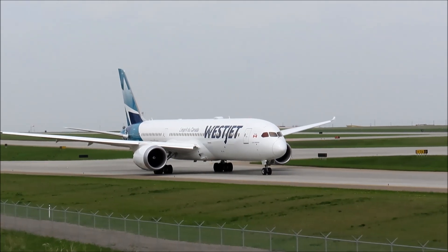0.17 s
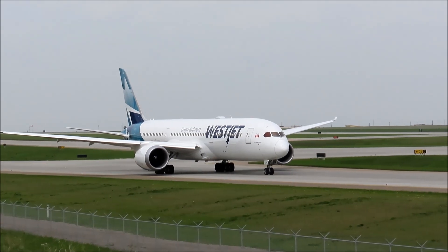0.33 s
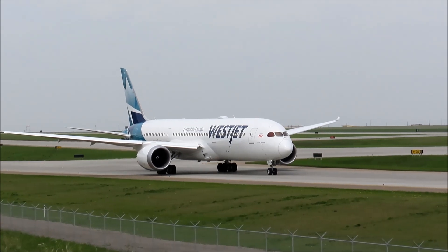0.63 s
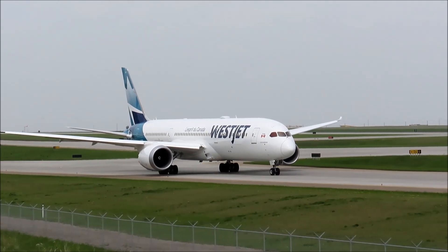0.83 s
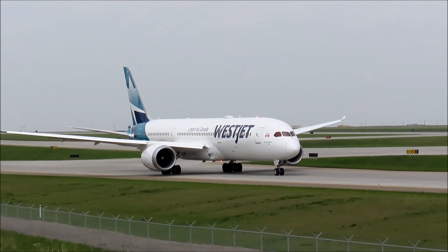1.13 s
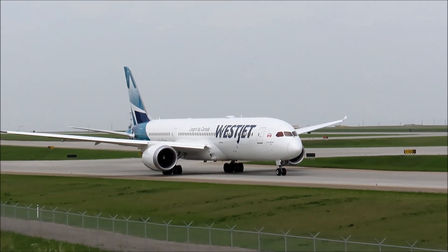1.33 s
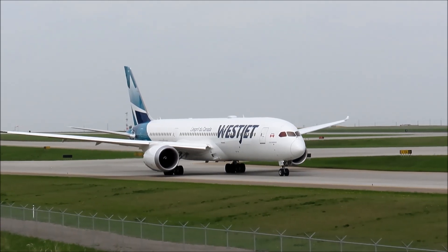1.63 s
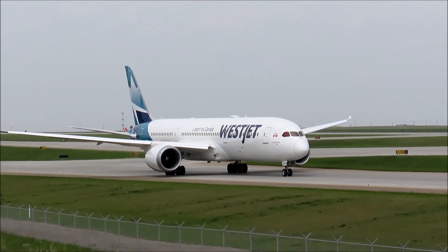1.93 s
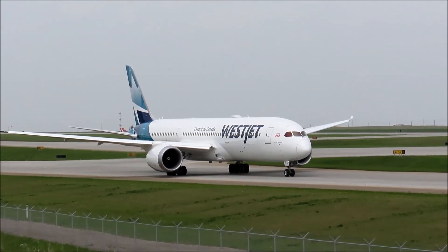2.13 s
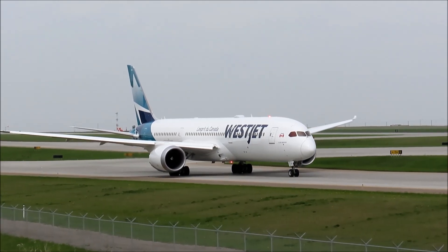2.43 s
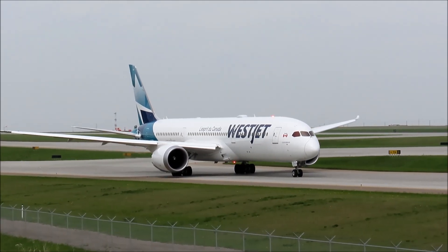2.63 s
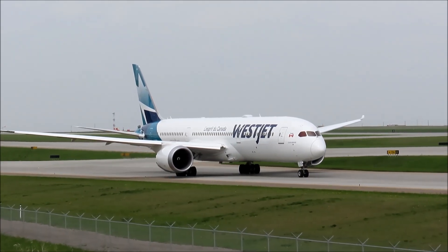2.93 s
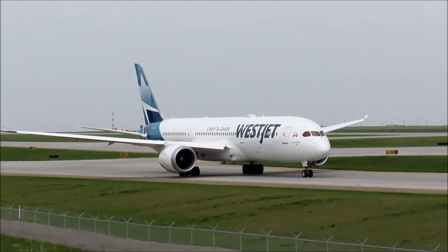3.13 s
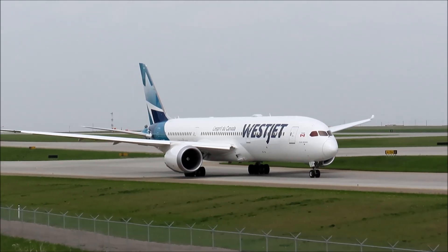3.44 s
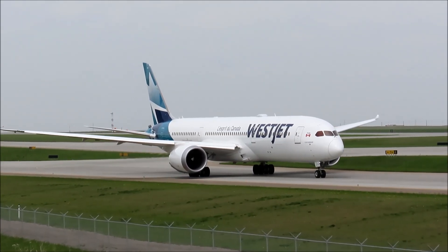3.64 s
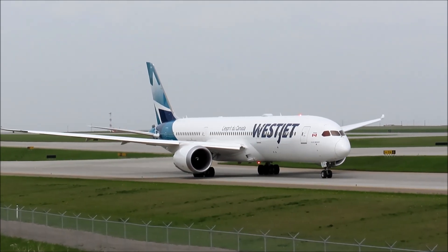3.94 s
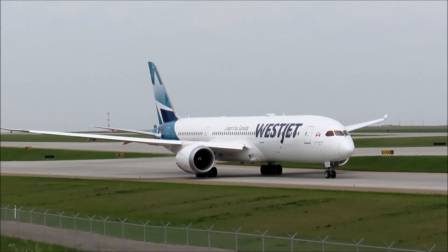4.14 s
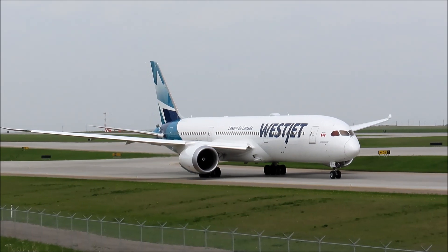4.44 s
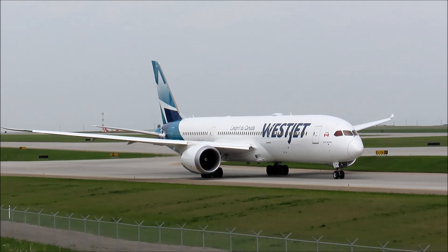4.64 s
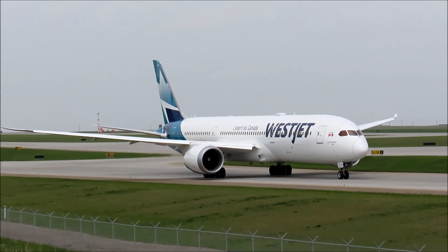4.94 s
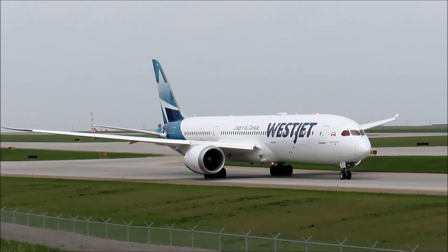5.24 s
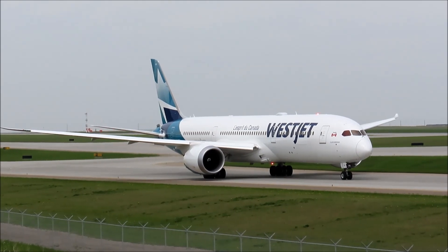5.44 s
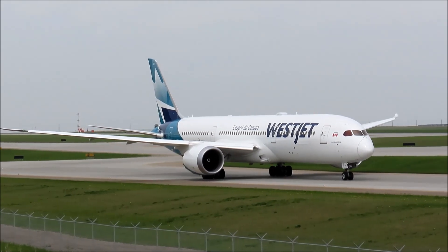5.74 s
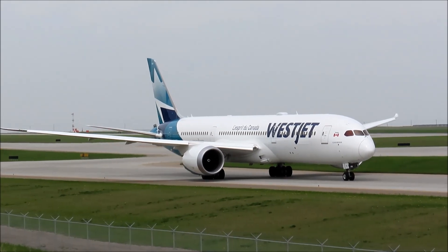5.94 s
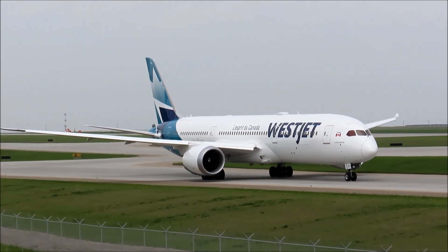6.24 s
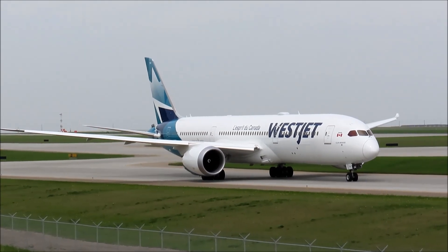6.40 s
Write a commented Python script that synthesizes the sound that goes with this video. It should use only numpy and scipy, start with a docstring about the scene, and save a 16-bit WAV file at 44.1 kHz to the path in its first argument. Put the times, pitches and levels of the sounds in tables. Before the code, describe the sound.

A large jet taxis with a wavering roar and thin high whine, then a propeller plane's low drone swells past amid soft wind thumps.

```python
"""At a grass field, two large jet engines idle some way off: a broad roar with thin compressor whines.
The roar swells in bands as the air between bends the sound. A propeller aircraft passes on a straight line,
its four blade tones sinking in pitch. Gusts thump as low noise on a small two-capsule microphone, whose
capsules hear most of the jet sound out of step. A faint hiss flickers above."""
import sys
import numpy as np
from scipy import signal
from scipy.fft import rfft, irfft, next_fast_len
from scipy.io import wavfile
from scipy.ndimage import uniform_filter1d

SR = 44100
rng = np.random.default_rng(int(sys.argv[2]) if len(sys.argv) > 2 else 0)


def persist_wave(psi):
    """Save psi, clipped to +-1, as 16-bit WAV."""
    counts = np.round(np.clip(psi, -1, 1) * 32767).astype(np.int16)
    wavfile.write(sys.argv[1], SR, np.atleast_2d(counts).T)


N = 289737
FFT_SIZE = next_fast_len(N)
HZ = np.maximum(np.fft.rfftfreq(FFT_SIZE, 1 / SR), 1)
T = np.arange(N) / SR   # seconds

# swell of the jet sound through the air: time_s, treble_swing_db, middle_swing_db
AIR_SWELL = [(0, -2.5, -0.5), (.14, 2.5, 1), (.3, 3, -3), (.55, 3.5, -0.5), (.75, 3.5, 1), (.9, 1, -1.5),
             (1.08, -1, 0), (1.37, 3.5, -0.5), (1.5, -0.5, 1.5), (1.64, 5, 1), (1.75, 6, 1), (1.84, 5, 0),
             (1.95, -.5, 3), (2.15, -2, 4), (2.6, 0.5, 0), (3, -0.5, -0.5), (3.3, -3, -4),
             (3.65, -1.5, -6.5), (4.15, -8, -6.5), (4.42, -8.5, -7.5), (4.6, -7.5, -3.5), (4.9, -6, -6),
             (5.15, -5.5, -4), (5.4, -5, -7.5), (5.65, -8.5, -9), (6, -7, -8.5), (6.37, -5, -6.5),
             (6.57, -4.5, -4)]


def roar(flicker_db, low_hz):
    """Broad jet noise, one part shared by both capsules and one scattered for each; its bands swell apart."""
    # usual roar before the bands move: frequency_hz, density_db (per Hz)
    roar_colour = [(40, -82), (70, -64), (140, -62), (170, -66.5), (220, -68), (350, -59.5), (480, -55),
                   (680, -54.5), (800, -56.5), (960, -57), (1150, -57), (1400, -62.5), (1750, -61),
                   (2050, -60.5), (2300, -59.5), (2850, -60.5), (3200, -62), (3500, -64), (3900, -65.5),
                   (4200, -67), (4500, -66), (5100, -68), (6000, -74), (7300, -84), (8200, -94),
                   (9200, -118), (10500, -150)]
    # intake resonance added to that colour: centre_hz, width_hz, height_db
    intake_hump = (2410, 515, 4.97)
    # overlapping bands: centre_hz, offset_db, treble_swing_share, middle_swing_share, rise_db_per_s
    bands = [(259, -3.5, 0.088, 0.043, 1.26), (434, -3, 0.14, .05, 0.14), (734, 0.5, 0.092, 0.43, -0.31),
             (1060, 1.37, 0.046, .95, 0), (1600, 1.04, 0.53, 0.32, 0.14), (2390, -2.5, 0.86, 0.16, -0.05),
             (2960, -1, 1.03, 0.12, 0.01), (3550, 0.5, 1.24, 0.081, 0.6), (4430, 0, 0.98, .05, 0.36),
             (5530, 0, 0.89, .05, 0.22), (7500, 0, 0.94, .05, 0.8)]
    # brief swells and sinks of the nearest band: peak_s, frequency_hz, change_db, length_s
    band_patches = [(0.16, 720, 3.5, 0.25), (2.2, 4300, -3, .4), (5.8, 4300, -3, .5),
                    (1.2, 4300, -0.5, 0.22), (2.4, 259, -5, 0.69), (2.4, 1600, 2, 0.28),
                    (0.23, 1600, 5.5, 0.18), (.85, 1600, 1.5, .4), (5.8, 1600, 1.5, .6),
                    (5.7, 720, -0.5, .6), (6.1, 259, 1.5, .6), (2.12, 1070, 1.5, .25),
                    (2.4, 1070, 2.5, 0.2), (2.4, 720, -0.5, .4), (3.5, 1070, 2.5, .4), (3.2, 720, 2, .6),
                    (3.1, 259, 1.5, .6), (0.83, 5500, -6.5, .2), (1.15, 2400, -2, 0.42),
                    (1.44, 2400, 5, 0.19), (2.03, 450, -3, 0.57), (2.128, 2400, -6, 0.091),
                    (2.27, 2400, 4, .3), (2.57, 2400, -4.5, 0.18), (4.89, 3500, 3.5, 0.31),
                    (4.4, 450, -3.5, 0.93), (5.42, 3500, 5.5, 0.24), (1.75, 5500, 0.5, .25),
                    (1.37, 2400, -3, .15), (3.5, 2950, 0.5, .3), (7, 450, 8, 0.25), (6.1, 5500, -2.5, 0.28),
                    (6.3, 450, 5, .5)]
    # extra scattered roar in the low bands: time_s, boost_db
    low_scatter = [(0, 11), (.8, 8.5), (2, 5.5), (3.6, 4.5), (5.1, 2), (5.7, 4.5), (6.57, 5.5)]
    lean_start_db, lean_end_s = 4, 0.81   # the low bands lean left at first, then settle

    treble_db, middle_db = in_time(AIR_SWELL)
    scatter_db = in_time(low_scatter)[0]
    lean_db = lean_start_db * np.maximum(1 - T / lean_end_s, 0)

    hump_hz, width_hz, hump_db = intake_hump
    hump = hump_db * np.exp(-(2 * (HZ - hump_hz) / width_hz) ** 2)
    colour_db = in_hz(roar_colour)[0] + hump
    # the root turns density per Hz into gain for white noise
    white = rfft(rng.standard_normal((3, N)), FFT_SIZE)
    noise = white * amp(colour_db) * np.sqrt(SR / 2)

    centres = np.array(bands)[:, 0]
    shared, scattered = 0, 0
    for k, (hz, offset_db, treble_share, middle_share, rise) in enumerate(bands):
        level_db = offset_db + treble_share * treble_db + middle_share * middle_db + rise * T
        for peak_s, patch_hz, change_db, length_s in band_patches:
            nearest_band = np.abs(np.log(centres / patch_hz)).argmin()
            if nearest_band == k:
                level_db = level_db + change_db * bump(peak_s, length_s)
        # full at its own centre, fading to nothing at the neighbouring centres
        band_gain = np.interp(np.log(HZ), np.log(centres), np.arange(len(centres)) == k)
        low = hz < low_hz
        gain = amp(level_db + flicker_db * drift(5.7)) * panned(lean_db * low)
        parts = irfft(noise * band_gain, FFT_SIZE)[:, :N]
        shared = shared + gain * parts[0]
        scattered = scattered + gain * amp(scatter_db * low) * parts[1:]
    return shared, scattered


def whines(waver_hz, flutter_db, fades_per_s):
    """Sines of the compressor blades and a shaft hum that waver and flutter on their way through moving air."""
    # tone levels before the flutter: time_s, blade_tone_db, upper_neighbour_db, lower_neighbour_db (rms)
    whine_swells = [(0.0, -49.5, -60.0, -58.0), (0.06, -33.5, -47.0, -49.0), (0.1, -30.5, -46.5, -51.5),
                    (0.2, -34.0, -38.0, -52.5), (0.27, -33.0, -39.5, -55.0), (0.32, -50.0, -40.0, -50.0),
                    (0.4, -52.0, -40.5, -45.5), (0.44, -31.5, -40.0, -41.5), (0.48, -28.5, -39.5, -38.5),
                    (0.51, -29.0, -41.5, -39.5), (0.58, -34.0, -52.5, -53.0), (0.73, -30.0, -55.0, -54.0),
                    (0.77, -30.0, -43.5, -45.0), (0.84, -30.0, -43.0, -44.5), (0.89, -42.0, -45.5, -56.5),
                    (0.98, -43.0, -58.5, -56.5), (1.1, -42.0, -48.5, -45.5), (1.2, -42.0, -56.5, -55.5),
                    (1.27, -43.0, -46.5, -44.0), (1.34, -38.0, -55.5, -48.5), (1.41, -37.5, -48.5, -44.0),
                    (1.51, -36.5, -55.0, -48.0), (1.63, -32.5, -36.5, -50.0), (1.72, -31.0, -35.0, -48.5),
                    (1.82, -32.0, -45.5, -43.0), (1.87, -35.0, -52.0, -49.0), (1.97, -50.5, -46.0, -52.5),
                    (2.07, -58.0, -60.5, -56.0), (2.18, -42.0, -54.0, -54.5), (2.28, -48.5, -59.5, -54.0),
                    (2.34, -40.0, -52.0, -54.0), (2.42, -39.5, -47.5, -47.0), (2.48, -36.5, -45.5, -55.5),
                    (2.85, -38.0, -49.0, -43.0), (2.91, -35.5, -44.0, -42.0), (2.99, -35.5, -47.0, -56.0),
                    (3.11, -37.0, -43.0, -52.5), (3.18, -47.0, -42.0, -55.0), (3.3, -46.0, -51.5, -57.0),
                    (3.4, -37.5, -46.0, -54.5), (3.49, -37.5, -50.0, -45.5), (3.6, -41, -60.5, -57.0),
                    (3.65, -46.0, -51.5, -57.0), (3.75, -37.0, -58.5, -55.0), (3.84, -46.0, -55.0, -57.0),
                    (3.95, -50.0, -44.5, -59.5), (4.08, -44.0, -52.0, -45.0), (4.33, -53.5, -51.0, -65.0),
                    (4.54, -53.0, -50.0, -51.0), (4.62, -63.0, -63.0, -56.5), (4.81, -43.0, -43.0, -49.0),
                    (5.1, -44.5, -62.0, -62.0), (5.29, -44.5, -61.0, -53.5), (5.35, -49.0, -46.5, -48.5),
                    (5.41, -57.0, -41.5, -58.0), (5.53, -51.0, -40.0, -58.5), (5.69, -53.5, -47.0, -63.5),
                    (5.74, -55.0, -60.0, -49.0), (5.82, -46.0, -62.0, -55.0), (5.91, -46.5, -47.0, -55.0),
                    (6.0, -47.0, -60.0, -57.0), (6.09, -52.0, -50.0, -52.0), (6.16, -43.0, -48.0, -55.0),
                    (6.24, -43.0, -48.0, -50.0), (6.29, -55.0, -56.0, -48.0), (6.38, -42.5, -44.0, -43.5),
                    (6.49, -41.5, -43.5, -49.0), (6.56, -53.5, -45.5, -56.5)]
    # blade tone and its shaft-rate neighbours, in the same order: pitch_hz
    whine_pitches = [3791.2, 3959.6, 3621.6]
    # shaft hum: pitch_hz, level_db (rms before swings), treble_swing_share, middle_swing_share, fading_db
    shaft_hum = (863.5, -37.5, 0.6, 1.2, 1.5)

    treble_db, middle_db = in_time(AIR_SWELL)
    hum_hz, hum_db, treble_share, middle_share, fading_db = shaft_hum
    hum_db = hum_db + treble_share * treble_db + middle_share * middle_db
    hum_gain = amp(hum_db + fading_db * drift(fades_per_s))
    # these levels glide in gain rather than in decibels
    whine_gains = in_time([(s, *amp(levels_db)) for s, *levels_db in whine_swells])

    tones = 0
    for hz, gain in zip([hum_hz, *whine_pitches], [hum_gain, *whine_gains]):
        phase = 2 * np.pi * np.cumsum(hz + waver_hz * drift(5.6)) / SR
        flutter = amp(flutter_db * drift(8.6))
        tones = tones + np.sqrt(2) * gain * flutter * np.sin(phase)
    return tones


def capsules(shared, scattered, tones):
    """Shared sound reaches each capsule at its own level and phase; the scattered part is unrelated."""
    # capsule pair towards the jets: frequency_hz, left_over_right_db, left_lead_rad, likeness (0 to 1)
    capsule_pair = [(170.0, 4.2, -2.3, 0.95), (260.0, 3.6, -2.57, 0.9), (400.0, 2.8, -3.02, 0.95),
                    (560.0, -1.2, -2.83, 0.97), (750.0, -1.7, -3.18, 0.98), (900.0, -5.2, -3.43, 0.955),
                    (1150.0, -4.8, -3.05, 0.94), (1300.0, -3.2, -3.15, 0.96), (1450.0, -2.6, -3.22, 0.93),
                    (1900.0, -5.2, -3.42, 0.95), (2350.0, -2.6, -3.75, 0.97), (2700.0, -4.8, -4.09, 0.86),
                    (3300.0, -1.0, -4.59, 0.93), (3500.0, -4.1, -4.94, 0.89), (3620.0, -5.2, -4.86, 0.89),
                    (3800.0, -4.8, -4.75, 0.9), (3900.0, -3.4, -4.9, 0.9), (4050.0, -6.3, -5.41, 0.74),
                    (4150.0, -9.2, -4.08, 0.43), (4350.0, -1.3, -4.07, 0.94), (4700.0, -0.1, -4.75, 0.92),
                    (5100.0, 4.7, -5.05, 0.92), (6000.0, 6.2, -6.15, 0.87), (6800.0, 3.0, -6.72, 0.85),
                    (7300.0, 6.0, -6.57, 0.73), (8000.0, 7.8, -7.79, 0.35), (8500.0, 5.0, -8.34, 0.34)]
    pan_db, lead, likeness = in_hz(capsule_pair)
    likeness = np.clip(likeness, 0, 1)
    turn = np.exp(.5j * np.outer([1, -1], lead))   # half the lead on each side
    gains = panned(pan_db)
    together = shape(shared, gains * turn * np.sqrt(likeness))
    apart = shape(scattered, gains * np.sqrt(1 - likeness))
    return together + apart + shape(tones, gains * turn)


def propeller(flutter_db):
    """Four sine partials of the blade rate, Doppler-shifted by the speed of approach on a straight pass."""
    # partial levels before flutter and panning: time_s, first_db, second_db, third_db (rms)
    partial_levels = [(0.0, -36, -36.5, -35), (0.08, -34, -33.5, -33), (0.13, -30.5, -38, -42),
                      (0.19, -33.5, -45.5, -39), (0.39, -38.5, -46, -36.5), (0.49, -37.5, -49, -27),
                      (0.57, -42.5, -43.5, -32.5), (0.61, -46, -41, -36), (0.66, -39, -47, -56),
                      (0.71, -43, -58, -43), (0.75, -44, -61, -33.5), (0.9, -46, -57, -50),
                      (1.05, -51, -53, -45), (1.4, -46, -54, -39), (1.66, -41.0, -51, -36.5),
                      (1.71, -43, -54, -36), (1.76, -46, -55, -55), (1.92, -41, -60, -59),
                      (2.21, -41.5, -45.5, -40), (2.45, -35, -41, -48), (2.65, -36.5, -40, -54),
                      (2.76, -35, -50, -41), (2.84, -35, -51, -50), (3.05, -30.5, -41.5, -32.5),
                      (3.16, -30, -40, -34), (3.24, -26, -42, -45), (3.65, -18.5, -37, -38.5),
                      (3.85, -16.5, -38.5, -36.5), (3.94, -18, -36.5, -34), (4.11, -16, -33.5, -35.5),
                      (4.38, -17.5, -34.5, -46.0), (4.46, -19.5, -40, -41.5), (4.61, -15, -37.5, -56),
                      (4.69, -16.5, -36, -42), (4.86, -19, -50, -55), (4.94, -17, -50, -40.5),
                      (5.12, -20, -50.0, -55.5), (5.18, -21, -49.0, -39), (5.25, -20, -48.0, -47),
                      (5.32, -20.0, -50, -35.5), (5.36, -19.5, -48.0, -39), (5.41, -20, -50, -56),
                      (5.56, -23.5, -52, -49), (5.61, -22.5, -57, -59), (5.87, -21, -46, -42),
                      (5.96, -24.0, -49, -49), (6.31, -23, -44, -54), (6.41, -24.5, -40.5, -34.5),
                      (6.56, -24, -51, -38)]
    # short swells of partial 4, likewise: peak_s, level_db (rms), length_s
    fourth_swells = [(.57, -37, .35), (1.07, -42, .15), (1.47, -43, .15), (2.35, -41, .35), (3.27, -42, .2),
                     (5.22, -40.5, .3), (6.45, -43, .2)]
    # sides of each partial: left_over_right_before_db, left_over_right_after_db,
    # left_lead_before_rad, left_lead_after_rad
    partial_sides = [(8.5, 6, .45, -.48), (7.5, 7, -4.1, -2.35), (7.5, 3.5, -3.8, -2.6), (1, 2, -3.3, -2.8)]
    blade_rate_hz, speed_m_s, sound_m_s = 105.2, 74.4, 343
    nearest_m, nearest_s = 285, 4.463
    # partial 1 swings left, peaking at 3.0 s when the partials change side, then settles
    swing_peak_db, side_change_s, side_change_width_s, settle_s = 13, 3.0, .2, 0.7

    ahead_m = speed_m_s * (nearest_s - T)
    approach = ahead_m / np.hypot(ahead_m, nearest_m)   # share of the speed towards the microphone
    hz = blade_rate_hz / (1 - speed_m_s / sound_m_s * approach)
    phase = 2 * np.pi * np.cumsum(hz) / SR

    late = T - side_change_s
    swing_db = swing_peak_db * np.exp(np.where(late < 0, late / side_change_width_s, -late / settle_s))
    changed = 1 / (1 + np.exp(-late / side_change_width_s))
    turned = np.clip(T / (side_change_s + settle_s), 0, 1)   # slower turn for the upper partials

    fourth_gain = sum(amp(db) * bump(s, length_s) for s, db, length_s in fourth_swells)
    fourth_db = 20 * np.log10(fourth_gain + 1e-9)
    levels_db = [*in_time(partial_levels), fourth_db]

    drone = 0
    for k, (level_db, sides) in enumerate(zip(levels_db, partial_sides)):
        pan_before, pan_after, lead_before, lead_after = sides
        pan_db = pan_before + (pan_after - pan_before) * changed + swing_db * (k == 0)
        lead = lead_before + (lead_after - lead_before) * (turned if k else changed)
        wave = np.sin((k + 1) * phase + np.array([lead / 2, -lead / 2]))
        gain = amp(level_db + flutter_db * drift(7.2))
        drone = drone + np.sqrt(2) * gain * panned(pan_db) * wave
    return drone


def wind(evened, over_s):
    """Low rumble, alike on both capsules, its loudness partly evened out; strong gusts thump over steadier wind."""
    # colour of the rumble before it is set to level: frequency_hz, density_db (per Hz)
    wind_colour = [(8, -8), (22, 2.5), (32, 2.5), (45, -2), (65, -6), (90, -11), (130, -16), (200, -23),
                   (400, -50), (1500, -110)]
    # wind on the microphone before smaller random gusts: time_s, level_db (rms)
    wind_level = [(0, -42.5), (.3, -38), (.65, -34), (.75, -32.5), (.95, -35), (1.08, -36), (1.4, -34.5),
                  (2.5, -35), (3.1, -35.5), (3.8, -36.5), (4.05, -40), (4.5, -51), (5.4, -45.5), (6.1, -48),
                  (6.57, -34)]
    # strong gusts: peak_s, level_db (rms), length_s
    strong_gusts = [(0.518, -31.5, 0.027), (0.842, -19, 0.13), (1.235, -31, 0.13), (1.41, -33, 0.018),
                    (1.522, -25.5, 0.038), (2.05, -28, 0.043), (2.498, -33, .04), (2.758, -29, 0.043),
                    (2.943, -31, 0.11), (3.532, -36, .03), (3.78, -29, .06), (3.89, -27, 0.11),
                    (6.46, -29, .05)]
    gust_edge = 2.3                  # squareness of a strong gust
    gusty_db, gusty_per_s = 2, 12    # smaller gusts come at random
    gust_top_hz = 170                # strong gusts are a little duller than the steady wind

    dulling = 1 / np.hypot(1, (HZ / gust_top_hz) ** 2)
    colours = amp(in_hz(wind_colour)[0]) * [np.ones(len(HZ)), dulling]
    rumble = shape(rng.standard_normal(N), colours)
    size = int(over_s * SR)
    power = uniform_filter1d(uniform_filter1d(rumble ** 2, size=size), size=size)
    rumble = rumble / np.maximum(power, 1e-12) ** (evened / 2)
    steady, gusty = rumble / rumble.std(axis=1, keepdims=True)

    level = amp(in_time(wind_level)[0] + gusty_db * drift(gusty_per_s))
    gust_power = sum((amp(db) * bump(s, length_s, gust_edge)) ** 2 for s, db, length_s in strong_gusts)
    total_power = gust_power + level ** 2
    gust_share = gust_power / total_power
    mixed = steady + gust_share * (gusty - steady)
    return np.sqrt(total_power) * mixed * amp([[.3], [-.3]])   # slightly louder on the left


def hiss(flicker_db):
    """A thin flickering high-passed noise, unrelated left and right, faintest while the drone is loud."""
    # white noise level before the high-pass and flicker: time_s, level_db
    hiss_level = [(0, -67), (2, -70), (3.3, -65), (3.9, -73), (4.7, -83.5), (5.6, -74.5), (6.57, -68.5)]
    high_pass = signal.butter(4, 8800, "high", fs=SR, output="sos")
    high = signal.sosfilt(high_pass, rng.standard_normal((2, N)))
    return amp(in_time(hiss_level)[0] + flicker_db * drift(14)) * high


def panned(left_over_right_db):
    """Left and right gains whose summed power stays the same."""
    left_share = 1 / (1 + amp(-2 * np.asarray(left_over_right_db)))
    return np.sqrt(2 * np.array([left_share, 1 - left_share]))


def bump(peak_s, length_s, edge=2):
    """Rises to 1 at its peak and falls away again; a higher edge is squarer."""
    return np.exp(-np.abs(2 * (T - peak_s) / length_s) ** edge)


def drift(rate_hz):
    """Slow random wander with spread 1: noise through two equal low-pass poles, one value per 40 samples."""
    pole = np.exp(-80 * np.pi * rate_hz / SR)
    noise = rng.standard_normal(N // 40 + 2002)
    slow = signal.lfilter([1], [1, -2 * pole, pole * pole], noise)[2000:]   # drop the run-in
    return np.interp(np.arange(N) / 40, np.arange(len(slow)), slow / slow.std())


def shape(x, gain):
    """Filter by a gain per frequency bin."""
    return irfft(rfft(x, FFT_SIZE) * gain, FFT_SIZE)[..., :N]


def in_time(rows):
    """Columns of a curve over seconds, one value a sample."""
    seconds, *columns = np.transpose(rows)
    return np.array([np.interp(T, seconds, column) for column in columns])


def in_hz(rows):
    """Columns of a spectrum, one value a frequency bin, straight lines over log frequency."""
    hz, *columns = np.transpose(rows)
    return [np.interp(np.log(HZ), np.log(hz), column) for column in columns]


def amp(db):
    """Decibels to gain."""
    return 10 ** (np.asarray(db) / 20)


def scene():
    """Jets through the capsule pair, then propeller, wind and hiss added in stereo."""
    shared, scattered = roar(flicker_db=.9, low_hz=2000)
    tones = whines(waver_hz=1.6, flutter_db=1.6, fades_per_s=2.5)
    jets = capsules(shared, scattered, tones)
    drone = propeller(flutter_db=.4)
    gusts = wind(evened=0.55, over_s=0.025)
    return jets + drone + gusts + hiss(flicker_db=3.0)


def record(dry):
    """A steep low-pass cuts the top, 70 dB down from 15750 Hz upwards."""
    low_pass = signal.cheby2(12, 70, 15750, fs=SR, output="sos")
    return signal.sosfilt(low_pass, dry)


dry = scene()
out = record(dry)
persist_wave(out)
```